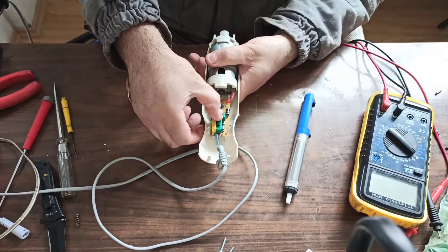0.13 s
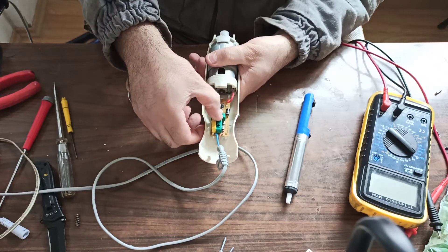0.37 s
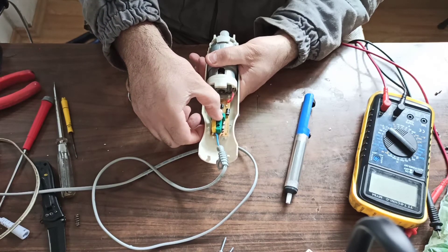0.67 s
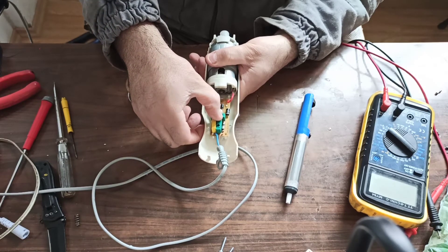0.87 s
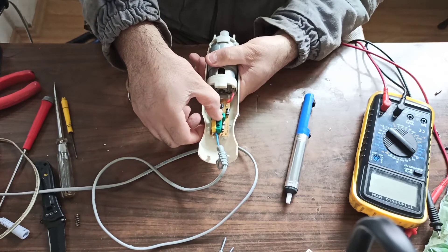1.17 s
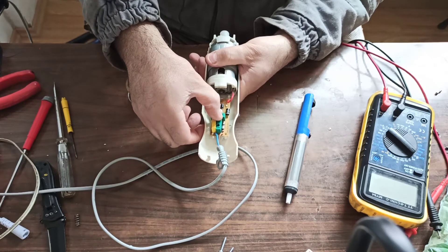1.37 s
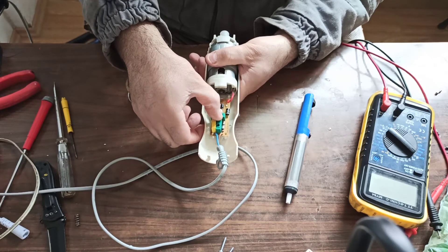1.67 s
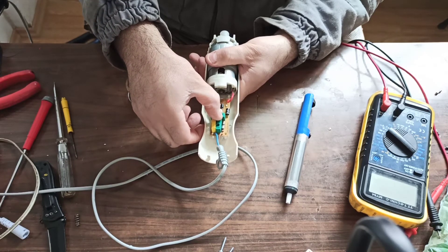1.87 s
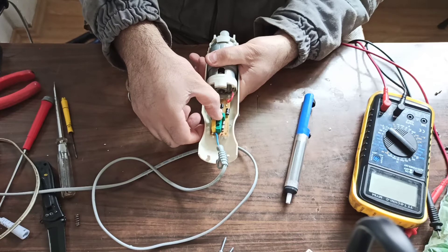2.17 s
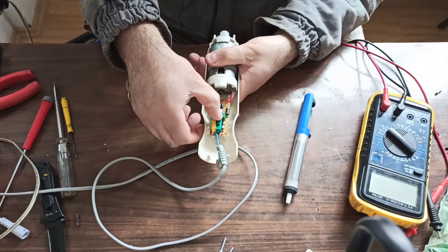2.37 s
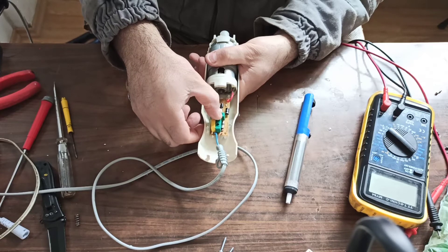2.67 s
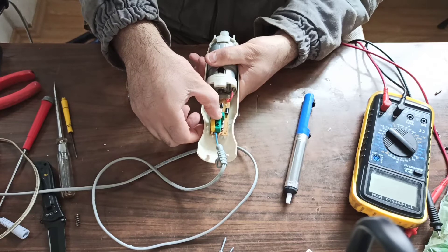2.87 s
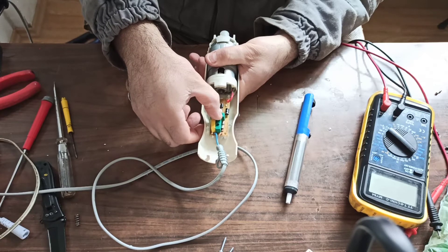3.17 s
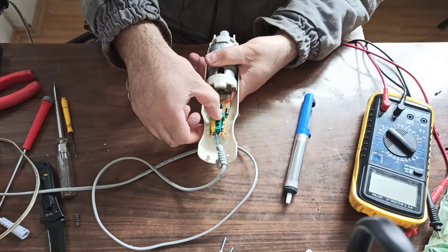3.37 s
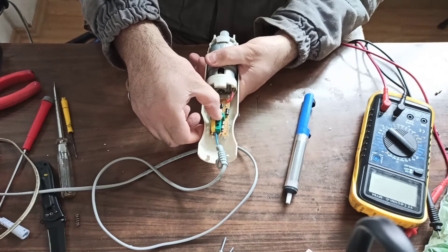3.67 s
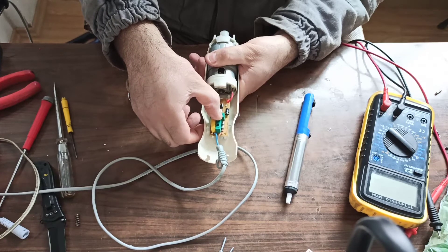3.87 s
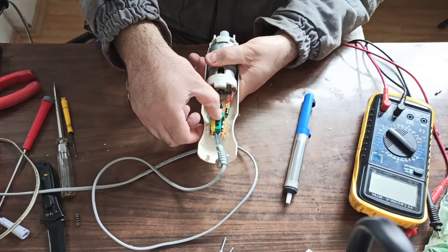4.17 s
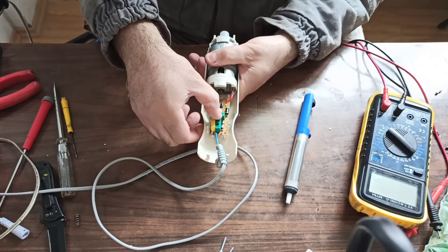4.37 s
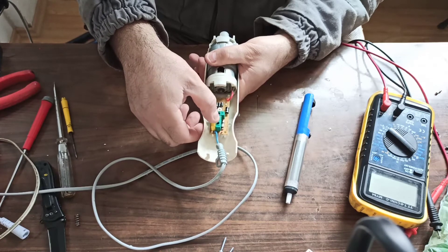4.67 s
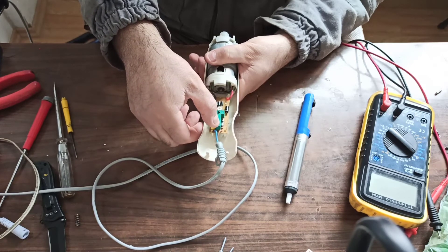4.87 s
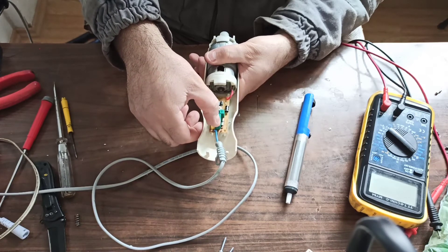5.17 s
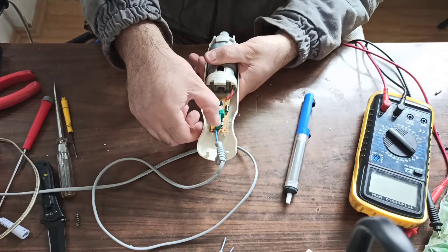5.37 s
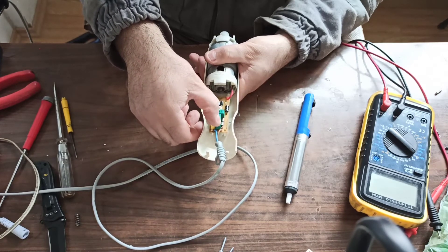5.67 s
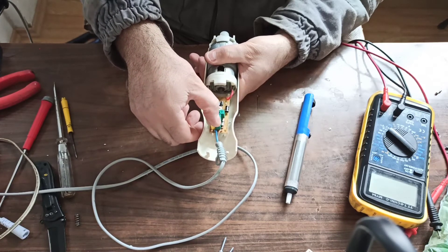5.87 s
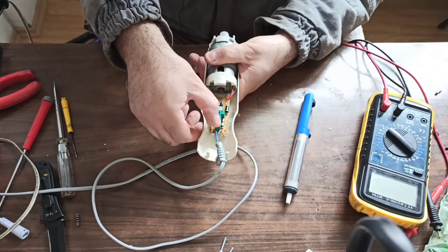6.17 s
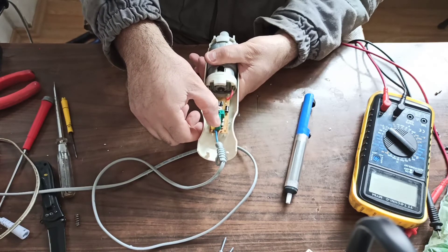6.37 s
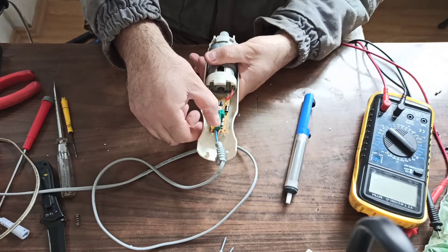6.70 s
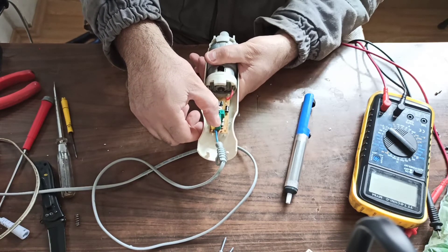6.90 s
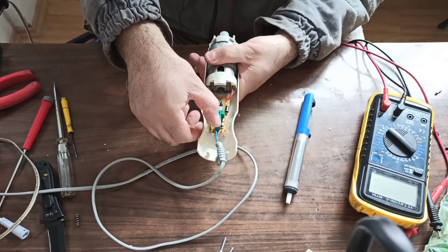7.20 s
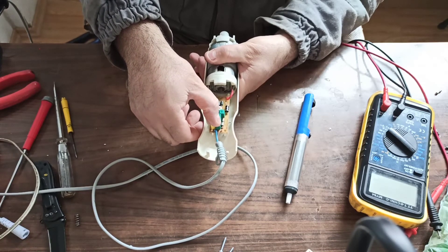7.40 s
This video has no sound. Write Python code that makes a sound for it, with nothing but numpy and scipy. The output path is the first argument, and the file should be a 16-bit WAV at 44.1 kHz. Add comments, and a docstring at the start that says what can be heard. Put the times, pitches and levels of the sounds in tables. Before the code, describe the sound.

Close to the microphone in a quiet room, the small electric motor of an opened hand blender runs three times, its hissing whine rising in pitch and falling as it coasts. The first run is the longest and develops a bearing rattle, the second is shorter and smoother, and the third is a brief, softer spin. Sharp switch clicks mark the power going on and off, and only faint room hum remains.

```python
"""A small mains motor in an open plastic casing, held over a workbench, spins up and coasts three times.
The shaft repeats a pattern every turn and rings the casing; the brushes whine on 24 commutator bars,
hiss and shake the metal frame. The bearing rattles at the top of the first run, the field coil hums
under power and the switch clicks. A quiet room drones behind, heard by two close microphone ports."""
import sys
import numpy as np
from scipy import signal
from scipy.fft import rfft, irfft, next_fast_len
from scipy.io import wavfile
from scipy.ndimage import uniform_filter1d, map_coordinates

SR = 44100
rng = np.random.default_rng(int(sys.argv[2]) if len(sys.argv) > 2 else 0)


def wav_out(sig):
    """Save sig, one row per channel (or a flat mono array), as 16-bit PCM at SR to the path in sys.argv[1]."""
    wavfile.write(sys.argv[1], SR, np.round(np.clip(np.atleast_2d(sig).T, -1, 1) * 32767).astype(np.int16))


N = 332514
T = np.arange(N) / SR
FULL_SPEED, CRAWL_SPEED = 200, 20  # turns/s: reference for the levels; the motor fades below the crawl

# spells with the switch closed: on/s, off/s, pull on the shaft/(turns/s^2), hum level/dB
POWER = [(-1, 2.693, 982.2, -52.5), (3.412, 4.391, 990.4, -54), (5.844, 6.337, 509.1, -62)]
# bearing rattle cues, t/s: starts knocking, starts settling, settled, stops knocking, quiet again
RATTLE_CUES = (1.03, 1.45, 1.95, 2.72, 3.42)


def gain_of(db):
    """dB to gain."""
    return 10 ** (np.asarray(db) / 20)


def unit_rms(x):
    """Scales to rms 1."""
    return x / np.sqrt(np.mean(x ** 2) + 1e-20)


def curve(points, hz):
    """Reads breakpoints on a log-frequency axis."""
    f, value = np.transpose(points)
    return np.interp(np.log(hz + 1), np.log(f + 1), value)


def colour(x, gain):
    """Filters by a gain given as a function of frequency."""
    size = next_fast_len(N + 4096)
    return irfft(rfft(x, size) * gain(np.fft.rfftfreq(size, 1 / SR)), size)[..., :N]


def peak(hz, centre, width):
    """A resonance curve of height 1."""
    return 1 / (1 + (2 * (hz - centre) / width) ** 2)


def waver(grain, shape=N):
    """Random drift of rms 1, smoothed over `grain` steps of the first axis."""
    noise = rng.standard_normal(shape)
    return unit_rms(uniform_filter1d(uniform_filter1d(noise, int(grain), 0), int(grain), 0))


def gate(on, off, ramp_s):
    """One between two times, with short ramps."""
    return np.clip(np.minimum(T - on, off - T) / ramp_s, 0, 1)


def shaft_speed():
    """Turns/s: the pull surges with the inrush current and weakens with speed; friction and drag brake."""
    surge, surge_s, step_s = 2.4, .015, .002
    friction, drag = 99.74, .6973  # turns/s^2, 1/s
    quarter_pull_speed = 214.2
    t = np.arange(0, N / SR + step_s, step_s)
    pulls = sum(drive * np.clip(np.minimum(t - on, off - t) / step_s + .5, 0, 1)
                * (1 + surge * np.exp(-np.maximum(t - on, 0) / surge_s)) for on, off, drive, _ in POWER)
    speed = [127.8]  # already spinning up
    for pull in pulls[:-1]:
        now = speed[-1]
        acceleration = pull / (1 + now / quarter_pull_speed) ** 2 - friction - drag * now
        speed.append(max(now + step_s * acceleration, 0))
    return np.interp(T, t, speed)


def casing_db(hz):
    """The plastic casing's resonances, held level below 400 Hz and above 8600 Hz."""
    # casing response: f/Hz, level/dB
    response = [(240, -56), (400, -28), (520, -30), (573, -23), (640, -19), (770, -8), (831, -11),
                (1100, -6), (1290, -16), (1560, -7), (2020, -12), (2260, -5), (3410, -8), (4030, -3),
                (4800, -7), (5490, -13), (8600, -6), (11200, -36), (18900, -120)]
    return curve(response, np.clip(hz, 400, 8600))


def spin(turns, orders, wander_db, slip, voiced_at=None):
    """A two-turn wavetable whose (order, level/dB) lines drift in level and slip in phase."""
    frames, (order, db) = N // 512 + 2, np.transpose(orders)
    db = db - 10 * np.log10(np.sum(gain_of(db) ** 2) / 2)
    if voiced_at:  # the levels are those heard through the casing at this many turns/s
        db = db - casing_db(order * voiced_at)
    grid = (frames, len(order))
    drift_db = wander_db * np.minimum(.3 + order / 20, 1) * waver(2, grid)  # low orders hold steadier
    phase = rng.random(len(order)) + slip * order * np.cumsum(rng.standard_normal(grid), 0)
    lines = np.zeros((frames, 1025), complex)
    lines[:, np.round(2 * order).astype(int)] = 1024 * gain_of(db + drift_db) * np.exp(2j * np.pi * phase)
    waves = irfft(lines, axis=1)
    looped = np.c_[waves, waves[:, 0]]
    return map_coordinates(looped, [T * SR / 512, turns / 2 % 1 * 2048], order=1)


def shaft(speed, turns, boost_db):
    """The shaft rings the casing; a bearing knock that differs every other turn adds half orders."""
    # smooth running, orders 1, 2, 3 ..: level/dB
    smooth_db = [-19, -27, -21, -6, -11, -7, -16, -5, -4, -9, -11, -5, -8, -12, -10, -7, -10, -11, -8, -7,
                 -10, -14, -2, -9, -13, -12, -14, -22, -23, -19, -14, -16, -20, -21, -19, -15, -16, -12,
                 -11, -13, -14, -12, -10, -13]
    # loose rattle, orders .5, 1, 1.5 ..: level/dB
    loose_db = [-11, -8, -28, -26, -34, -14, -24, -7, -26, -16, -17, -11, -13, -1, -9, 0, -5, -2, -24, -13,
                -18, -2, -11, -1, -15, -7, -8, -3, -8, -5, -14, -7, -13, -3, -7, 0, -8, -14, -11, -7, -14,
                -5, -10, -6, -11, -4, -15, -4, -10, -12, -15, -5, -14, -18, -18, -13, -17, -19, -21, -7,
                -12, -9, -14, -10, -11, -7, -15, -20, -20, -15, -11, -9, -11, -14, -15, -20, -11, -17, -9,
                -12, -5, -8]
    # settled rattle, orders .5, 1, 1.5 ..: level/dB
    settled_db = [-14, -8, -22, -26, -38, -11, -27, -6, -38, -9, -21, -17, -21, -9, -19, -7, -16, -14, -26,
                  -10, -10, 1, -12, -5, -17, -5, -11, -8, -11, -11, -15, -8, -14, -12, -15, -7, -16, -10,
                  -16, -9, -8, -5, -6, -6, -6, -12, -14, -4, -16, -11, -20, -11, -19, -14, -18, -15, -24,
                  -15, -16, -9, -18, -13, -14, -13, -16, -14, -21, -17, -17, -9, -12, -14, -21, -20, -13,
                  -11, -7, -15, -13, -10, -15, -27]

    def pattern(db, spacing, voiced_at):
        orders = np.c_[spacing * np.arange(1, len(db) + 1), db]
        return spin(turns, orders, wander_db=3, slip=.0006, voiced_at=voiced_at)

    smooth = pattern(smooth_db, spacing=1, voiced_at=191)
    loose = pattern(loose_db, spacing=.5, voiced_at=206)
    settled = pattern(settled_db, spacing=.5, voiced_at=211)
    start, settle_from, settle_to, stop, _ = RATTLE_CUES
    knocking = gate(start, stop, .015)
    settling = np.clip((T - settle_from) / (settle_to - settle_from), 0, 1)
    knock = np.sqrt(1 - settling) * loose + np.sqrt(settling) * settled
    purr = smooth + gain_of(-9) * loose  # a trace of play even in smooth running
    level_db = -35.4 + 13 * np.log2((speed + 1) / FULL_SPEED) + boost_db
    vibration = gain_of(level_db) * ((1 - knocking) * purr + knocking * knock)
    # the casing is too small to radiate bass
    return colour(vibration, lambda hz: gain_of(casing_db(hz)) / (1 + (190 / (hz + 1)) ** 4))


def commutator_whine(speed, turns, running):
    """The brushes sing on the passing bars, sweeping through steep resonances as the speed changes."""
    # bar tone, then its overtones, each with side lines: shaft order, level/dB
    bar_orders = [
        [(24, 0), (23, -5), (25, -11), (22, -20)],
        [(48, 0), (47, -4), (49, -5), (46, -9), (50, -9), (72, -11), (71, -16), (73, -16)],
    ]
    # resonances that pick out the whine: f/Hz, width/Hz, level/dB
    formants = [(880, 190, -59), (1150, 300, -53), (1500, 300, -62), (1790, 200, -56), (2070, 200, -53),
                (2600, 190, -41), (3130, 380, -45), (3860, 480, -35), (4300, 300, -38.5), (4700, 300, -49),
                (5650, 600, -37), (6330, 550, -31), (6850, 500, -34), (7450, 700, -34), (8300, 500, -35)]
    tone, overtones = (spin(turns, orders, wander_db=2, slip=.0014) for orders in bar_orders)
    overtone_gain = gain_of(-10) / (1 + (58 / (speed + 1)) ** 8)  # dies away below 58 turns/s
    rasp = gain_of(3 * waver(.002 * SR))  # the brushes bounce on the bars
    buzz = running * rasp * (tone + overtone_gain * overtones)
    return colour(buzz, lambda hz: sum(gain_of(db) * peak(hz, f, width) ** 1.5
                                       for f, width, db in formants))


def brush_hiss(speed, turns, boost_db):
    """Sliding noise, pulsing as the brush pressure changes round the turn."""
    # hiss colour: f/Hz, level/dB
    spectrum = [(300, -16), (600, -10), (1000, 1), (1300, -3), (1700, 7), (2300, 7), (3300, 7), (4000, 6),
                (4700, 4), (5400, 2), (6200, 8), (7000, 7), (8300, 4), (8600, 2), (10000, 0), (11000, -40)]
    band_hz = 3300  # bandwidth in which the level is given
    level_db = -52 + .095 * (speed - FULL_SPEED) + boost_db
    pressure = 1 + .21 * np.cos(2 * np.pi * turns) + .32 * np.cos(4 * np.pi * turns)
    hiss = colour(pressure * rng.standard_normal(N), lambda hz: gain_of(curve(spectrum, hz)))
    return gain_of(level_db) * hiss * np.sqrt(SR / 2 / band_hz)


def frame_ring(speed):
    """The brushes shake narrow, high resonances out of the metal frame."""
    # frame modes: f/Hz, width/Hz, level/dB
    modes = [(7120, 83, -16), (7630, 45, -11), (8140, 100, -8), (8460, 74, 0)]
    shake = rng.standard_normal(N)
    ring = colour(shake, lambda hz: sum(gain_of(db) * peak(hz, f, width) for f, width, db in modes))
    level_db = -42.5 + .17 * (speed - FULL_SPEED) + 2.5 * waver(1300)
    return gain_of(level_db) * unit_rms(ring)


def motor(speed, turns, running):
    """Shaft, brushes and frame shudder together in the hand; current and rattle lift shaft and hiss."""
    powered_db = .3 * sum(gate(on, off, .02) for on, off, _, _ in POWER)
    start, _, _, stop, quiet = RATTLE_CUES
    shaken = gate(start, quiet, .015) * np.clip((quiet - T) / (quiet - stop), 0, 1) ** .5
    body = shaft(speed, turns, boost_db=powered_db + 4 * shaken)
    whine = commutator_whine(speed, turns, running)
    hiss = brush_hiss(speed, turns, boost_db=powered_db + 3 * shaken)
    ring = frame_ring(speed)
    shudder = gain_of(.7 * waver(.015 * SR))
    return shudder * (running * (body + hiss + ring) + whine)


def brush_fizz(speed, turns, running):
    """The top of the brush noise, scattered wide across the two ports and louder in the rattle."""
    # fizz colour: f/Hz, level/dB
    spectrum = [(10000, -30), (11500, 0), (14900, -1), (15500, -8)]
    likeness = .05  # left to right
    start, _, _, stop, _ = RATTLE_CUES
    left, spare = rng.standard_normal((2, N))
    pair = np.array([left, likeness * left + np.sqrt(1 - likeness ** 2) * spare])
    fizz = unit_rms(colour(pair, lambda hz: gain_of(curve(spectrum, hz)) * (hz > 9000)))
    level_db = -50.5 + .088 * (speed - FULL_SPEED) + 4 * gate(start, stop, .015) + .9 * waver(2500)
    scrape = 1 + .35 * np.cos(4 * np.pi * turns)  # twice a turn
    return running * gain_of(level_db) * scrape * fizz


def coil_hum(hum_hz=100):
    """The field coil pulls twice per mains cycle while the switch is closed."""
    level = sum(gain_of(db) * gate(on, off, .0082) for on, off, _, db in POWER)
    return np.sqrt(2) * level * gain_of(1.2 * waver(6100)) * np.sin(2 * np.pi * hum_hz * T)


def room_tone():
    """A bed of wavering air, fuzzy low drones and a rumble through the bench that swells twice."""
    # colour of the air: f/Hz, level/dB
    spectrum = [(15, -75), (25, -36), (70, -23.5), (117, -7), (145, -14.5), (236, -12), (263, -12),
                (293, -16), (317, -21.5), (354, -16), (476, -19), (516, -21), (560, -21.5), (8590, -47.5),
                (16000, -36.5)]
    # stereo image: f/Hz, left-right likeness
    image = [(25, .75), (60, 0.95), (110, .95), (180, .85), (550, 0.5), (1650, 0), (4970, 0.31),
             (15000, 0.01)]
    # low drones: f/Hz, width/Hz, level/dB
    drones = [(120.6, 4.7, -61), (164, 28, -68.5), (239, 13, -62.5), (291.4, 8, -70), (346.3, 18, -72.5)]
    # rumble swells: centre t/s, half length/s, level/dB
    swells = [(2.2, .3, -60), (5.95, .25, -66)]
    left, spare = rng.standard_normal((2, N))
    shared = colour(left, lambda hz: curve(image, hz))
    apart = colour(spare, lambda hz: np.sqrt(1 - curve(image, hz) ** 2))
    pair = np.array([left, shared + apart])
    air = unit_rms(colour(pair, lambda hz: gain_of(curve(spectrum, hz))))
    bed = gain_of(-56.5 + .68 * waver(1000)) * air
    for f, width, db in drones:
        bed += gain_of(db) * unit_rms(colour(pair, lambda hz: peak(hz, f, width)))
    rumble = unit_rms(colour(pair, lambda hz: (hz / 60) ** 4 / (1 + (hz / 62) ** 8)))
    swell = sum(gain_of(db) * np.exp(-((T - at) / half) ** 2) for at, half, db in swells)
    return bed + (gain_of(-79 + 2 * waver(9000)) + swell) * rumble


def switch_clicks():
    """Each snap ticks the contact and rings the switch, brighter on pressing than on release."""
    # snaps: t/s, peak/dB, brightness/(dB/octave), lever knock/dB, spring ring/dB
    snaps = [(2.69, -23, -3, 0, -11), (3.4131, -21.5, 1, -12, -6), (4.3855, -22, 0, 0, 2),
             (5.8441, -20, 4, -2, -6), (6.3425, -15.5, -3.5, 2, 8)]
    # switch modes, lever first and spring last: f/Hz, level/dB, t60/s
    modes = [(2070, 0, .01), (1150, -20, .008), (2700, -10, .007), (3300, -10, .005), (4300, -9, .005),
             (5300, -9, .005), (7200, -4, .007), (8250, -3, .007), (14600, -9, .004), (6000, -2, .008)]
    length = 2000
    out, t = np.zeros(N + length), np.arange(length) / SR
    phases = rng.random((len(snaps), len(modes)))
    cracks = rng.standard_normal((len(snaps), length))
    for (at, peak_db, bright_db, lever_db, spring_db), phase, crack in zip(snaps, phases, cracks):
        struck = np.array(modes, float)
        struck[[0, -1], 1] += lever_db, spring_db
        ring = sum(gain_of(db + bright_db * np.log2(hz / 4000) - 60 * t / t60)
                   * np.sin(2 * np.pi * (hz * t + p)) for (hz, db, t60), p in zip(struck, phase))
        tick = .25 * np.diff(crack, prepend=0) * np.exp(-t / .00023)
        click = ring * np.minimum(t / .002, 1) + tick
        out[round(at * SR):][:length] += gain_of(peak_db) * click / abs(click).max()
    return out[:N]


def reverb(x, tail_db, echoes=()):
    """The room's stereo tail of sparse random taps dying by band, plus any distinct echoes."""
    # room decay: f/Hz, t60/s
    decay = [(200, 1), (1000, 0.76), (4000, 0.71), (12000, 0.28)]
    taps = np.zeros((2, SR // 2))
    at = np.arange(300, SR // 2 - 20, 20) + rng.integers(0, 20, (2, (SR // 2 - 301) // 20))
    np.put_along_axis(taps, at, rng.choice([-1., 1.], at.shape), 1)
    hz, t, bands = signal.stft(taps, SR, nperseg=256)
    tail = signal.istft(bands * gain_of(-60 * t / curve(decay, hz)[:, None]), SR, nperseg=256)[1]
    tail *= gain_of(tail_db) / np.linalg.norm(tail[0])
    for delay, db in echoes:
        tail[[0, 1], round(delay * SR) + rng.integers(0, 9, 2)] += gain_of(db)
    return signal.fftconvolve(x[None], tail, axes=1)[:, :N]


def ports(x):
    """The direct sound reaches each microphone port with its own balance and phase."""
    # left over right: f/Hz, level/dB
    balance = [(110, .5), (300, 3), (1300, -1.5), (2400, 2), (4400, 0.5), (6500, -4), (7500, 7.5),
               (8400, 10.5), (12000, -2.5)]
    # left ahead of right: f/Hz, phase/rad
    lead = [(0, 0), (3700, 1.1), (4820, 0.5), (5250, 1.7), (6550, 2.4), (7580, 3.0), (8100, 1.8),
            (8440, 3.0), (10600, 3.3), (11300, 3.3), (11800, 1.2), (13200, -9.2), (15100, -15.7),
            (16300, -12.2)]
    return np.array([colour(x, lambda hz: gain_of(side * curve(balance, hz))
                            * np.exp(1j * side * np.interp(hz, *np.transpose(lead))))
                     for side in (.5, -.5)])


def scene():
    """Motor and switch up close; the room fills in behind."""
    # slaps off the bench, hands and walls: t/s, level/dB
    echoes = [(.0011, -10), (.008, -18), (.0105, -15), (.0135, -13), (.018, -21), (.024, -22), (.029, -21)]
    speed = shaft_speed()
    turns = np.cumsum(speed) / SR
    running = np.clip(speed / CRAWL_SPEED, 0, 1) ** 2
    whirr, clicks = motor(speed, turns, running), switch_clicks()
    direct = ports(whirr + clicks + coil_hum())
    scatter = colour(reverb(whirr, tail_db=-12)[0], lambda hz: 1 / (1 + (600 / (hz + 1)) ** 2))
    wide = np.array([scatter, -scatter])  # reaches the ports in opposite phase
    tails = reverb(whirr, tail_db=-13) + reverb(clicks, tail_db=-9, echoes=echoes)
    return direct + wide + tails + brush_fizz(speed, turns, running) + room_tone()


def record(dry):
    """Tone colour, then the band limit."""
    # overall tone colour, with a lift near 6.5 kHz and a treble gap near 10 kHz: f/Hz, level/dB
    tone_colour = [(300, -1), (1200, -1), (2500, -1.5), (4000, -1), (5500, -1.5), (6500, 5.5), (7600, 4),
                   (8550, 2), (8750, -5), (9600, -18), (10600, -53), (11400, -40), (11600, 1), (15000, -1)]
    heard = colour(dry, lambda hz: gain_of(curve(tone_colour, hz)))
    lowpass = signal.firwin(511, cutoff=15850, window=("kaiser", 9), fs=SR)
    return signal.oaconvolve(heard, lowpass[None], "same")


dry = scene()
out = record(dry)
wav_out(out)
```